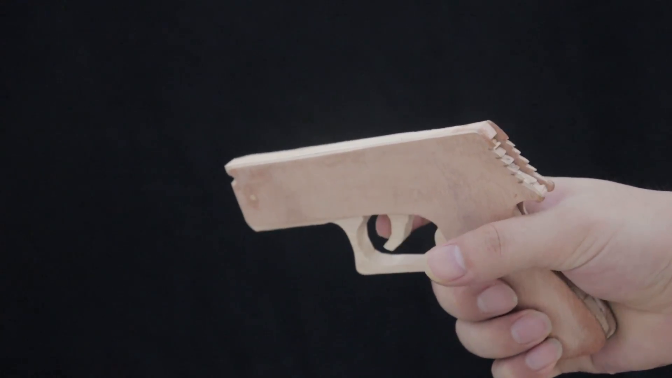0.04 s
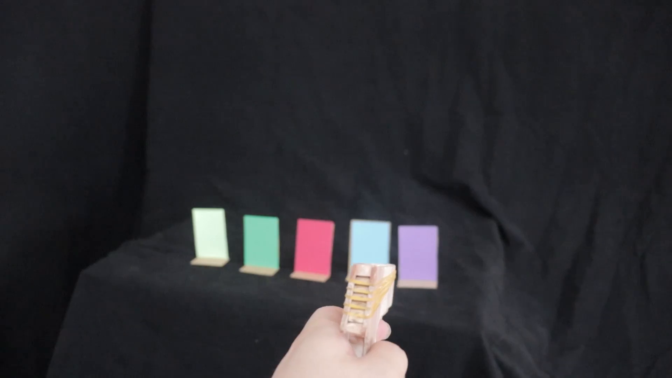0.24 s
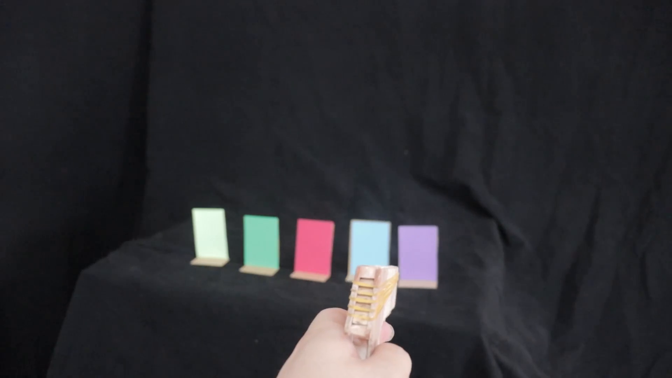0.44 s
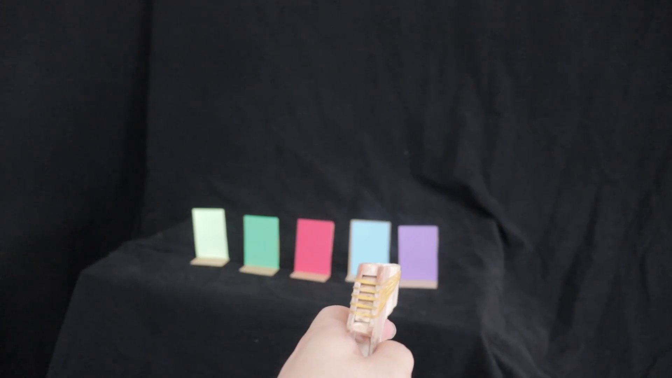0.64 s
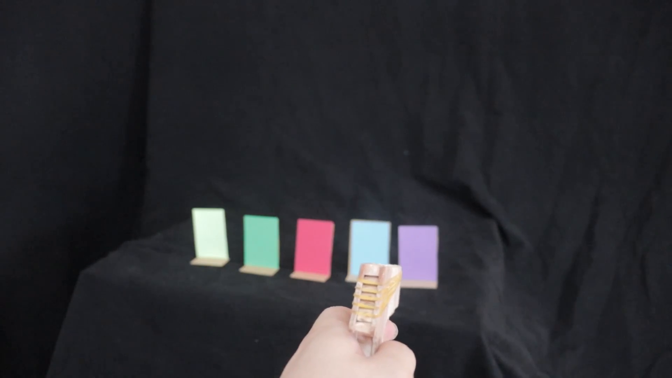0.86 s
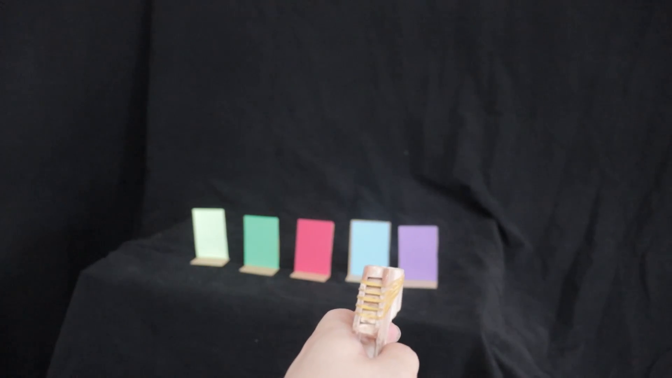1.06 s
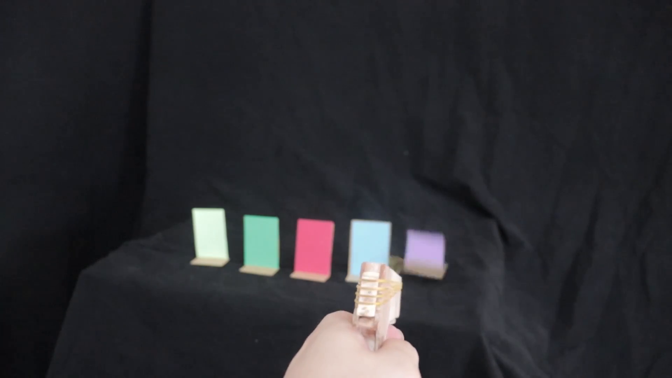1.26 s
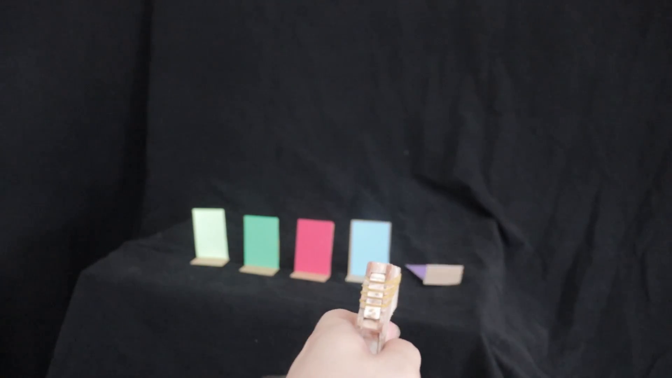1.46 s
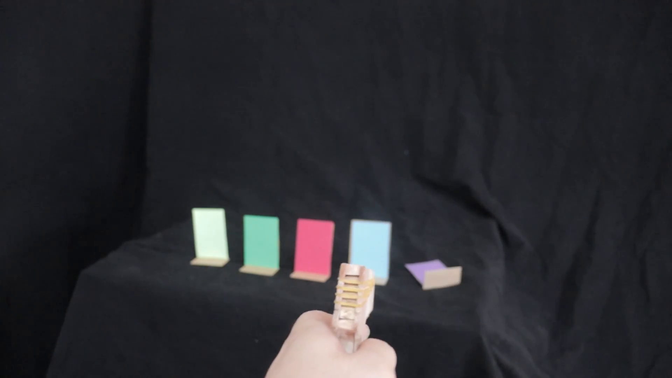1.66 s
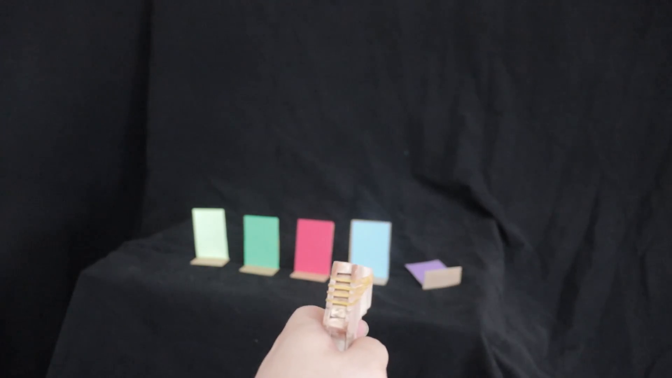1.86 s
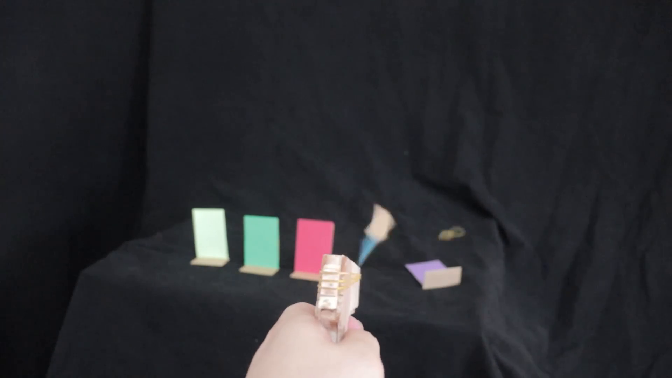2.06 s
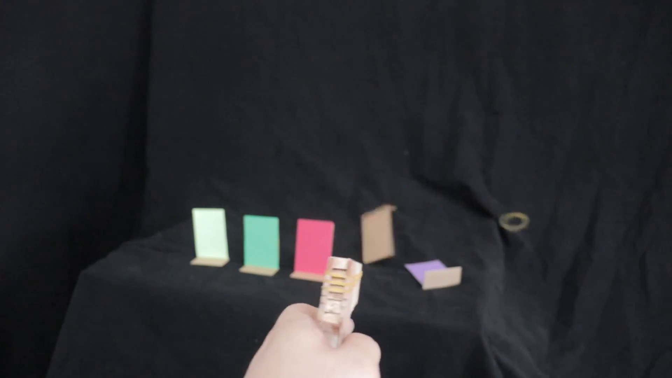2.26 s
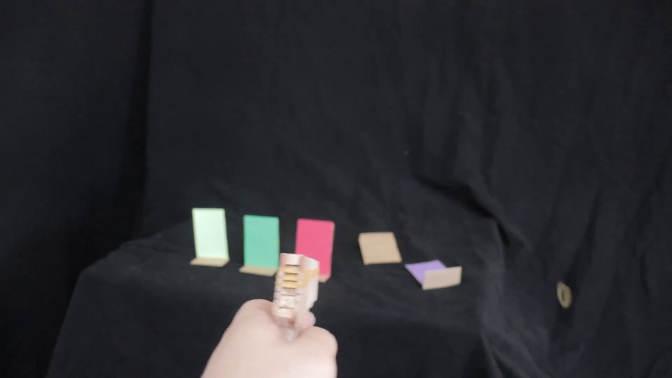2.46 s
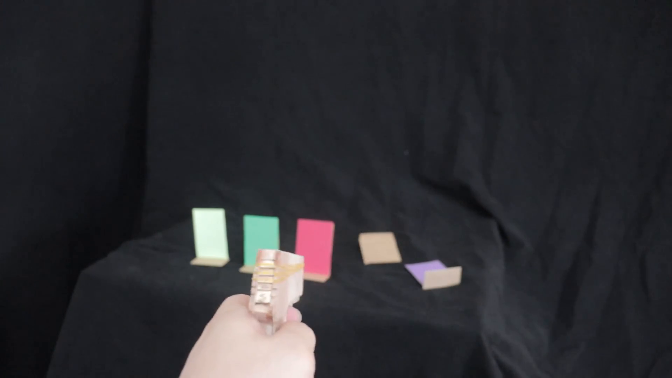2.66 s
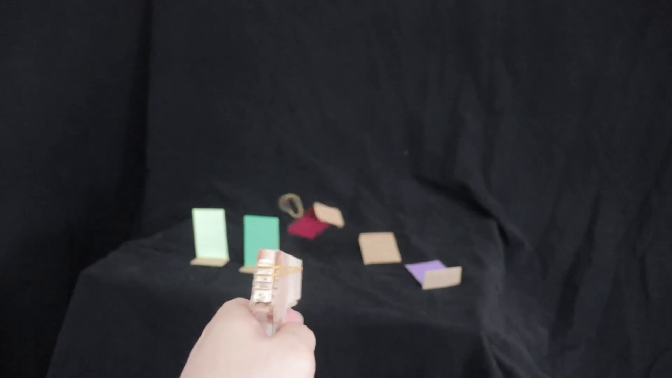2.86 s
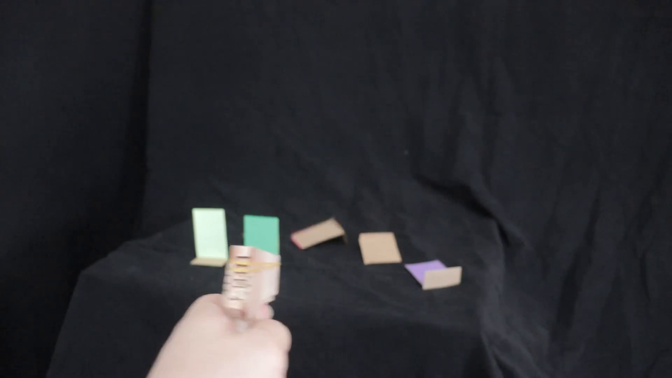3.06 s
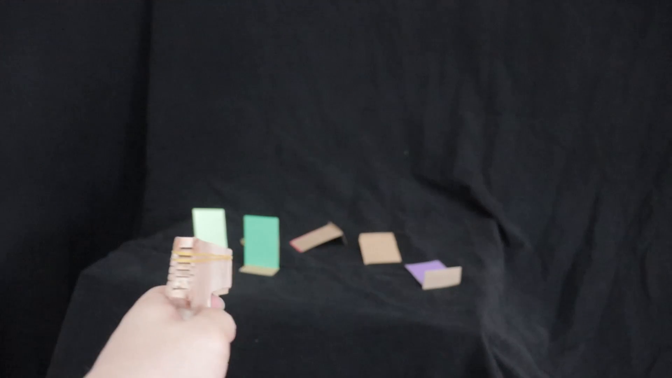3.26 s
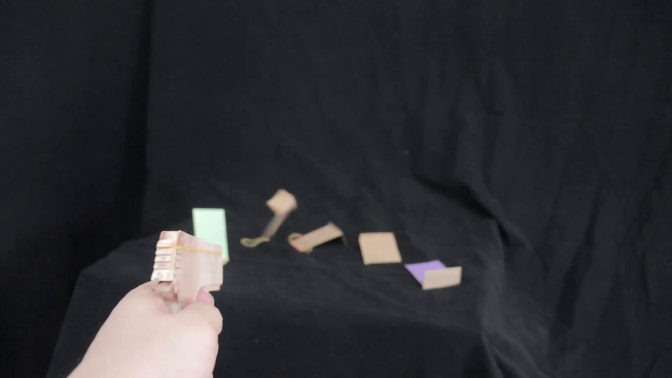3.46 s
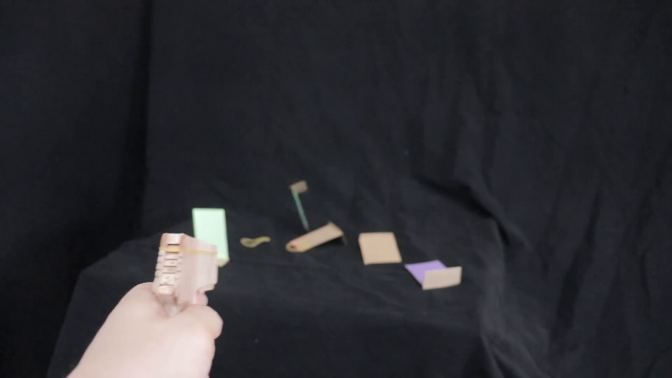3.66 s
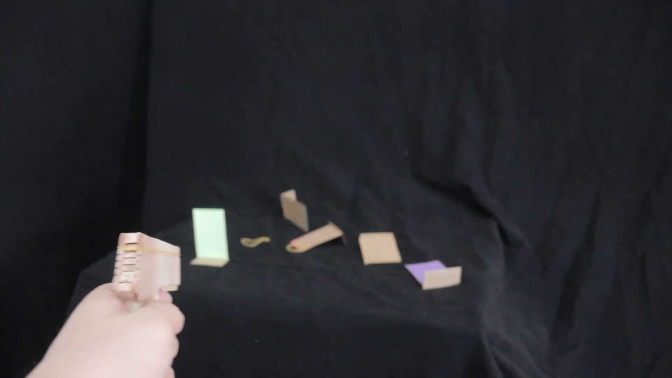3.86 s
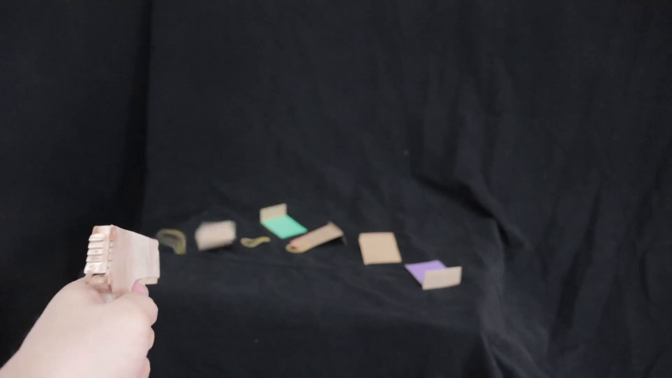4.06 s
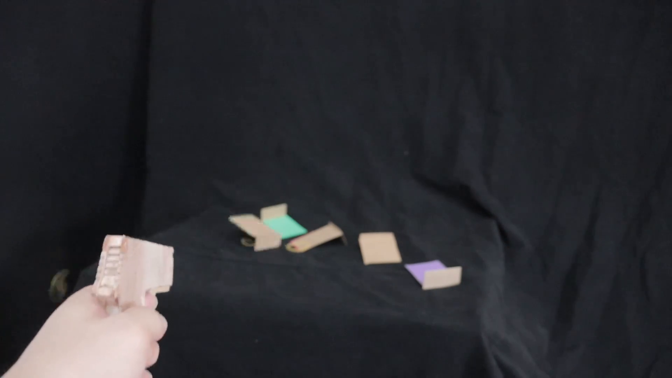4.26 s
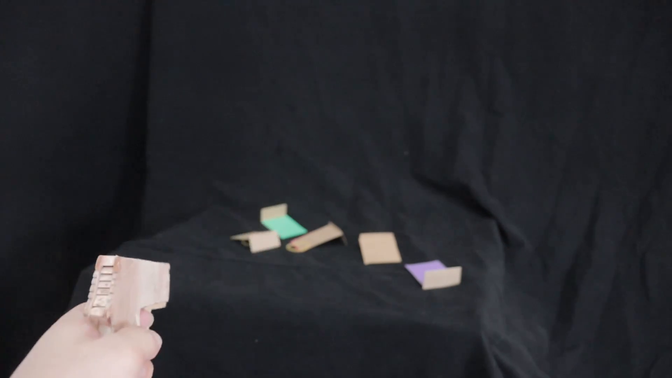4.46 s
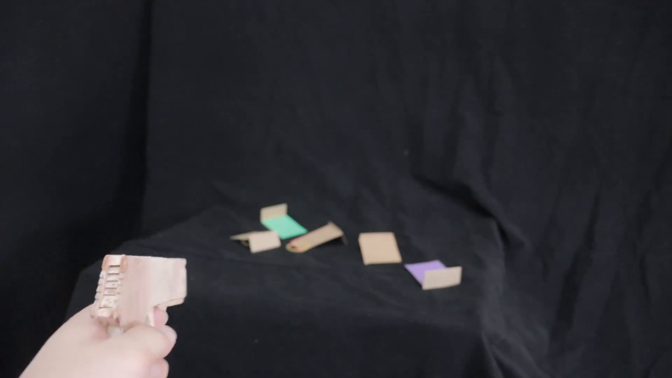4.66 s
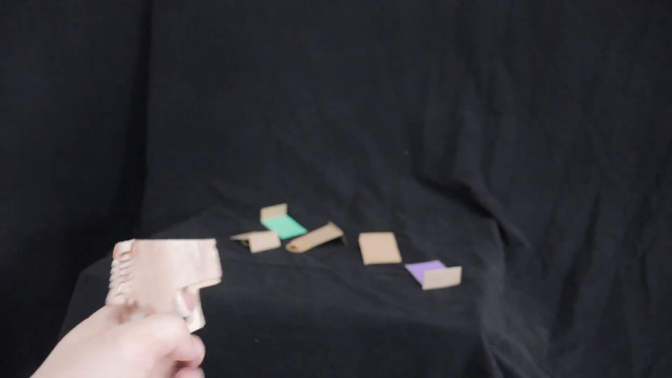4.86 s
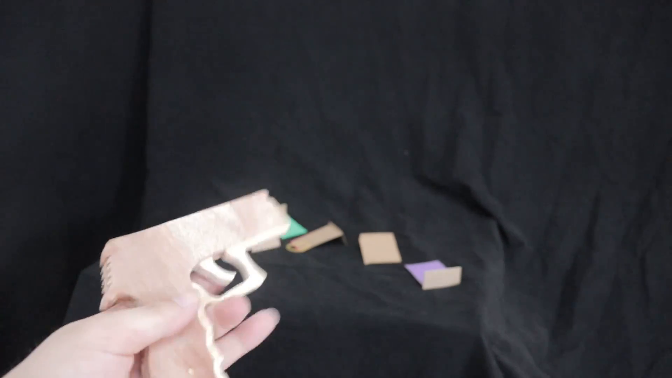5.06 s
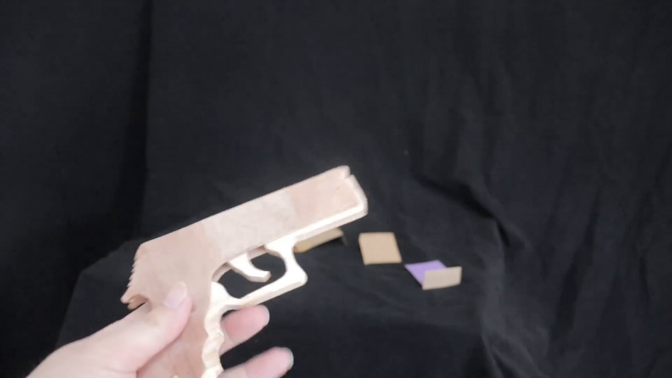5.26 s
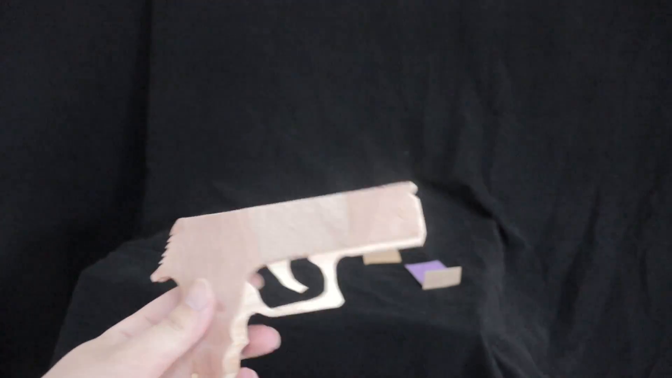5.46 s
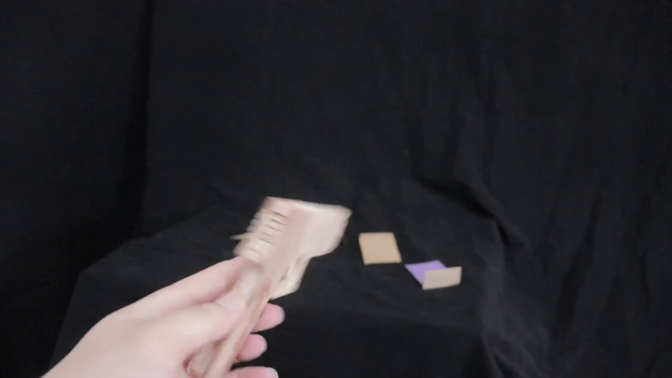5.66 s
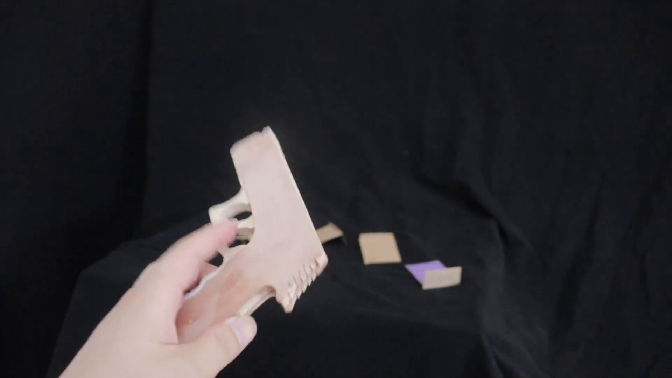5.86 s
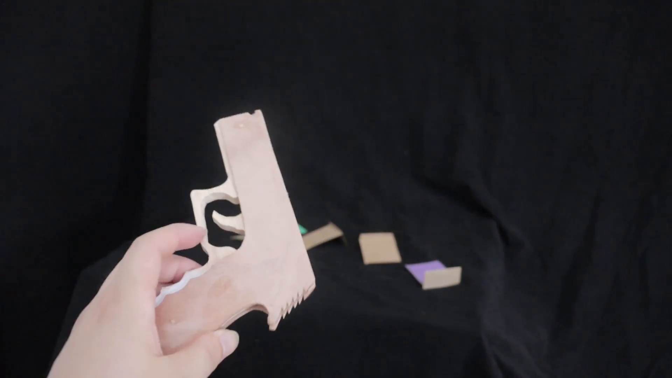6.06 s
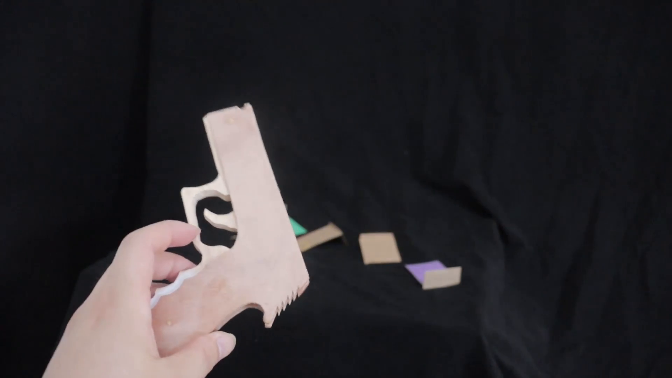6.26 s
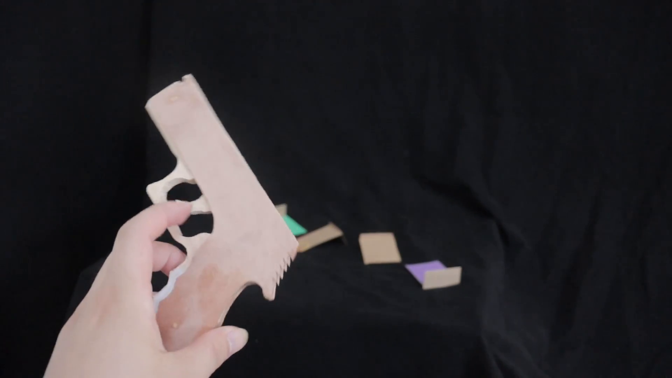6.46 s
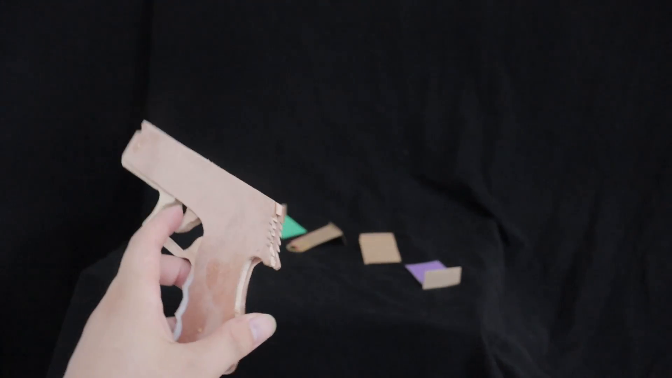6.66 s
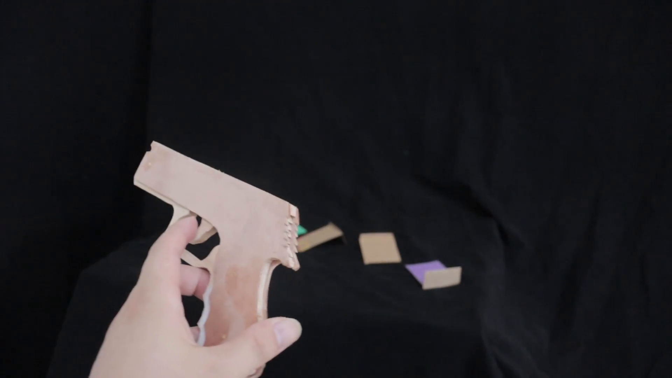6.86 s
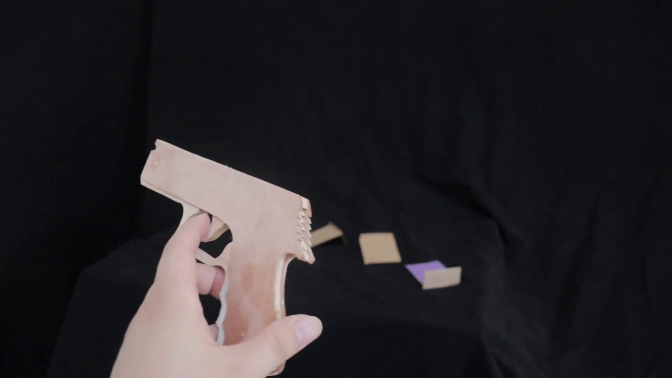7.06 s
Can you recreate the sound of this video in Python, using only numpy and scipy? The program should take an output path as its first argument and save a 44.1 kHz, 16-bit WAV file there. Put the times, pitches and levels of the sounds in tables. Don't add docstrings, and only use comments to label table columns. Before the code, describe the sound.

In a bare, echoing room, the tail of an earlier shot is cut off, leaving faint fan hum. A wooden rubber band gun close to the microphone then fires five times: a creak of rubber, quick ticks, a loud crack, a trigger click. Farther off, light cards skid and knock on a cloth-covered table. Finally hands rub the wood quietly.

```python
import sys
import numpy as np
from scipy import signal
from scipy.fft import rfft, irfft
from scipy.io import wavfile

SR = 44100
rng = np.random.default_rng(int(sys.argv[2]) if len(sys.argv) > 2 else 0)


def rack_gain(trim_db):
    fader = np.asarray(trim_db, float)
    return 10 ** (fader / 20)


def materialize(psi):
    bounded = np.clip(np.atleast_2d(psi).T, -1, 1)
    quanta = np.round(bounded * 32767).astype(np.int16)
    wavfile.write(sys.argv[1], SR, quanta)


N = 313536


def at_hz(points, hz, column=1):
    points = np.array(points)
    return np.interp(np.log(hz), np.log(points[:, 0]), points[:, column])


def rms_one(x):
    return x / np.sqrt(np.mean(x ** 2) + 1e-20)


def drift(rate):
    knots = rng.standard_normal(int(N / SR * 40) + 3)
    return np.interp(np.arange(N) / SR * rate, np.arange(len(knots)), knots)


def bands(spectrum, likeness, size):
    edges = 25 * 2 ** np.arange(0, 9.6, .5)
    white = rng.standard_normal((2, 2, size))
    for k, (low, high) in enumerate(zip(edges, edges[1:])):
        band_pass = signal.butter(2, [low, high], "band", fs=SR, output="sos")
        mid, side = signal.sosfilt(band_pass, white[k % 2])
        hz = min(np.sqrt(low * high), 14000)
        alike = at_hz(likeness, hz)
        pair = np.sqrt(1 + alike) * mid + np.sqrt(1 - alike) * side * [[1], [-1]]
        left, right = rack_gain(at_hz(spectrum, hz)) * pair
        yield hz, np.array([left, np.roll(right, 4)])


def coloured(x, spectrum, modes=()):
    grid_hz = np.maximum(np.arange(1025), 1) * SR / 2048
    power = rack_gain(at_hz(spectrum, grid_hz)) ** 2
    for hz, width, db in modes:
        power = power + rack_gain(db) ** 2 / (1 + (2 * (grid_hz - hz) / width) ** 2) ** 2
    cepstrum = irfft(np.log(power) / 2)
    cepstrum[1:1024] *= 2
    impulse = irfft(np.exp(rfft(cepstrum[:1025], 2048)))
    return signal.fftconvolve(x, [impulse], axes=1)[:, :x.shape[1]]


def body(x, modes):
    out = 0
    for k, (hz, width, db) in enumerate(modes):
        r = np.exp(-np.pi * width / SR)
        poles = [1, -2 * r * np.cos(2 * np.pi * hz / SR), r * r]
        out = out + (-1) ** k * rack_gain(db) * signal.lfilter([1 - r * r, 0, r * r - 1], poles, x)
    return out


def contact(ms, apart=.0):
    pair = []
    for shares in rng.uniform(.15, 1, size=(2, 3)):
        rattle = signal.unit_impulse(SR // 20)
        for lag in np.ceil(shares * ms * 1e-3 * SR).astype(int):
            loop = np.r_[1, np.zeros(lag - 1), -.62]
            rattle = signal.lfilter(loop[::-1], loop, rattle)
        pair.append(rattle)
    side = apart * signal.sosfilt(signal.butter(1, 2500, "high", fs=SR, output="sos"), pair[1])
    return np.array([pair[0] + side, pair[0] - side])


def add(track, s, sound, db, pan_db=0):
    i = round(s * SR)
    piece = sound[:, :track.shape[1] - i] * rack_gain(db) / np.abs(sound.mean(0)).max()
    track[:, i:i + piece.shape[1]] += piece * rack_gain(np.array([[pan_db], [-pan_db]]) / 2)


# [f/Hz, level/dB per Hz]
AIR = [(15, -56), (25, -35), (35, -11), (48, -17.5), (68, 3.5), (87, -11), (154, -7), (410, -11),
       (445, -13.5), (568, -14.5), (1600, -21.5), (2670, -27.5), (2900, -29), (14800, -43), (16500, -57.5)]
# [f/Hz, likeness -1 to 1]
AIR_LIKENESS = [(60, 0.98), (180, 0.97), (550, 0.76), (1650, -0.31), (4970, 0.24), (15000, -0.23)]
# [f/Hz, level/dB rms]
FAN = [(59.2, -56), (166.9, -60.5), (441.4, -60), (500.6, -61.5), (1276, -73.5), (1620, -68.5), (2945, -75)]
# [start t/s, end t/s, start f/Hz, end f/Hz, level/dB]
SQUEALS = [
    (5.697, 5.76, 860, 865, -54.5),
    (5.788, 6.0, 868, 873, -52.5),
    (5.887, 6.02, 1085, 1135, -58),
]


def background():
    air = sum(band * rack_gain(.7 * drift(5)) for hz, band in bands(AIR, AIR_LIKENESS, N))
    air = rms_one(air) * rack_gain(-50)
    t = np.arange(N) / SR
    tones = np.zeros(N)
    for hz, db in FAN:
        level = rack_gain(db + 2.5 + 2.4 * drift(8))
        tones += level * np.sin(2 * np.pi * np.cumsum(hz + 1.5 * drift(9)) / SR)
    for start, end, hz, end_hz, db in SQUEALS:
        swell = np.sin(np.pi * np.clip((t - start) / (end - start), 0, 1))
        glide_hz = np.interp(t, [start, end], [hz, end_hz])
        tones += rack_gain(db - 3.0 + 5.2 * drift(36)) * swell * np.sin(2 * np.pi * np.cumsum(glide_hz) / SR)
    return air + tones


# [f/Hz, time to fall 60 dB t/s, level/dB]
ROOM = [(100, 0.55, 2.5), (220, 1, -10.5), (330, 0.59, 3), (600, 0.58, 1.5), (1500, 0.66, -2.5),
        (4160, 0.66, 0), (9500, 0.48, 0.5), (16000, 0.98, -13.5)]
# [f/Hz, likeness -1 to 1]
ROOM_LIKENESS = [(100, 0.92), (300, 1), (700, 0.48), (1500, .55), (3000, 0.1), (8000, 0.1)]
# [f/Hz, time to fall 60 dB t/s, level/dB]
ROOM_MODES = [(106, 0.96, -3), (167.2, 0.89, -2), (193, 1.1, -1), (224.4, 1.5, -3), (244, 1.2, -0.5),
              (341, 0.55, -10), (412, 0.67, -7.5)]
# [t/ms, level/dB]
ECHOES = [
    (3.6, -12.5),
    (12.5, -11),
    (15.5, -8),
    (18.0, -9),
    (24.5, -16),
    (33.0, -16.5),
]


def room():
    t = np.arange(SR) / SR
    levels = [(hz, db) for hz, t60, db in ROOM]
    diffuse = bands(levels, ROOM_LIKENESS, SR)
    tail = sum(band * rack_gain(-60 * t / at_hz(ROOM, hz)) for hz, band in diffuse)
    for hz, t60, db in ROOM_MODES:
        tail += rack_gain(db - 23 - 60 * t / t60) * np.sin(2 * np.pi * hz * t)
    tail *= 1 - np.exp(-(t / 0.0062) ** 2)
    for ms, db in ECHOES:
        add(tail, ms * 1e-3, contact(ms=0.43, apart=0.98), db + 22.5)
    return tail * rack_gain(-36.5 + np.array([[.7], [-.7]]))


# [f/Hz, level/dB per Hz]
SNAP_CRACK = [(60, -38), (200, -9.5), (600, -15), (1300, -6.5), (3000, -10), (5000, -13.5), (8000, -17.5),
              (12000, -23), (17000, -28.5)]


def snap(modes, ms):
    return coloured(contact(ms, apart=0.9), SNAP_CRACK, modes)


# [t/s, peak level/dB, low, middle and high modes level/dB]
RETURNS = [
    (0.0378, -9, 0.5, -10, -8.5),
    (1.6187, -1, 1, 1.5, 5),
    (2.358, 2, -4, -1.5, 8.5),
    (3.0283, -11, 1.5, -6, -6),
    (3.694, -8, 0, -5, -2.5),
    (4.3225, -13.5, 3, -10, -11.5),
]
# [f/Hz, width f/Hz, level/dB]
TRIGGER_MODES = [(1822, 540, 1), (2200, 110, -0.5), (2800, 590, -0.5), (3144, 120, 4.5), (4740, 460, 1.5),
                 (6354, 200, -9), (7535, 430, -17), (9150, 450, -12), (10770, 810, -19.5),
                 (14900, 1800, -19)]
# [f/Hz, level/dB per Hz]
TRIGGER_CRACK = [(60, -61), (1250, -38.5), (1600, -16), (4000, -9), (9000, -15.5), (17000, -31.5)]


def trigger(rows):
    out = np.zeros((2, N))
    for s, db, low_db, mid_db, high_db in rows:
        crack_db = -1 + 0.22 * high_db
        modes = []
        for hz, width, level in TRIGGER_MODES:
            if hz < 2400:
                tilt_db = low_db
            elif 4000 < hz < 5500:
                tilt_db = mid_db
            else:
                tilt_db = high_db * (5500 < hz < 12000)
            modes.append((hz, width, level - crack_db + tilt_db))
        add(out, s, coloured(contact(ms=.6, apart=0.32), TRIGGER_CRACK, modes), db)
    return out


def earlier_shot(tail):
    lead, cut = round(0.27 * SR), round(.192 * SR)
    near = np.roll(trigger(RETURNS[:1]), lead, axis=1)[:, :lead + cut]
    add(near, 0, snap(SNAP_4, 1.1), 9.5)
    wet = signal.fftconvolve(near.mean(0, keepdims=True), tail, axes=1)[:, :lead + cut]
    return np.pad((near + wet)[:, lead:], ((0, 0), (0, N - cut)))


def ticks(rows):
    out = np.zeros((2, N))
    for s, db, hz, treble_db in rows:
        colour = [(300, -26.0), (1100, -11.5), (2500, -6.0), (6500, -9.0),
                  (9000, treble_db - 8.0), (17000, treble_db - 11.5)]
        add(out, s, coloured(contact(ms=.42, apart=0.73), colour, [(hz, 1100, 0)]), db - .7, 1.5)
    return out


# [t/s, peak level/dB, pitch f/Hz, treble level/dB]
TAPS = [
    (0.3398, -43.5, 2200, 10),
    (1.1874, -35.5, 3210, -14.5),
    (1.213, -35, 1861, -6),
    (1.9444, -39, 3110, -18),
    (5.0874, -32.5, 1498, -0.5),
    (5.1945, -40.5, 1770, 1),
    (5.248, -25.5, 3640, -13),
    (5.9017, -43, 2300, -25),
]


def taps():
    return ticks(TAPS)


def stroke(s, db, length, rise, sag_db_per_s, treble_db=0, release=.035):
    end_s, end_db = s + length, db - sag_db_per_s * length
    return [(s - rise, db - 20, treble_db), (s, db, treble_db),
            (end_s, end_db, treble_db), (end_s + release, end_db - 20, treble_db)]


def friction(strokes, colour, per_s, alike):
    strength = rack_gain(2.2 * rng.exponential(1, (2, N))) * rng.choice([-1, 1], (2, N))
    slips = (rng.random((2, N)) < per_s / SR) * strength
    grit = rms_one(coloured(slips + alike * slips[::-1], colour))
    dull = signal.sosfilt(signal.butter(2, 5500, fs=SR, output="sos"), grit)
    out = np.zeros((2, N))
    for rows in strokes:
        s, db, treble_db = np.transpose(rows)
        span = np.arange(round(s[0] * SR), round(s[-1] * SR))
        treble = (grit - dull)[:, span] * rack_gain(np.interp(span / SR, s, treble_db))
        out[:, span] += rack_gain(np.interp(span / SR, s, db)) * (dull[:, span] + treble)
    return out


# [f/Hz, level/dB per Hz]
RUB_COLOUR = [(300, -31.5), (1400, -12.5), (2200, 0.5), (3600, -5), (5000, -10.5), (8000, -12.5),
              (15000, -17)]
# [hold t/s, level/dB, slip t/s, level/dB]
PULLS = [
    (1.212, -51.5, 1.295, -47),
    (2.022, -48, 2.17, -46.5),
    (2.755, -51.5, 2.905, -39),
    (3.41, -50, 3.458, -42.5),
    (4.058, -50.5, 4.108, -40),
]
# [t/s, level/dB, length t/s, treble level/dB]
RUBS = [
    (4.976, -63.5, 0.033, 4),
    (5.042, -58.5, 0.08, 0.5),
    (5.2, -64.5, 0.021, 6),
    (5.27, -60, .15, 2),
    (5.605, -59, 0.1, -1),
    (5.716, -47.5, .015, -3.5),
]


def hands():
    strokes = []
    for s, db, length, treble_db in RUBS:
        strokes.append(stroke(s, db, length, .035, 40, treble_db))
    for (hold_s, hold_db, slip_s, slip_db), (snap_s, *_) in zip(PULLS, SHOTS):
        strokes.append(stroke(hold_s, hold_db, slip_s - hold_s, .022, 149.5, treble_db=3))
        strokes.append(stroke(slip_s, slip_db, snap_s - slip_s, .004, 0, treble_db=-3, release=.002))
    return friction(strokes, RUB_COLOUR, per_s=6300, alike=0.25)


# [t/s, peak level/dB, pitch f/Hz, treble level/dB]
SLIPS = [(1.2602, -24.5, 2630, -2), (1.2779, -27, 2800, -13.5), (1.291, -20.5, 3200, -5),
         (1.3056, -10.5, 4000, 1.5), (1.3162, -18.5, 6590, -15.5), (2.0573, -17, 4500, -5.5),
         (2.0708, -22.5, 3128, -6), (2.0764, -9.5, 6000, 5), (2.787, -30, 3200, -15),
         (2.8047, -15, 2900, -2), (2.8112, -15.5, 3300, 1.5), (3.4481, -17.5, 3500, 4),
         (3.4554, -14.5, 2200, 6.5), (3.466, -26, 2410, -5), (4.1021, -16.5, 2400, 10),
         (4.1064, -9.5, 2330, 8.5), (4.1162, -19, 3038, -16), (4.1234, -6.5, 2668, -15)]


def band_slips():
    slaps = []
    for s, db, hz, treble_db in SLIPS:
        delay_ms = 2.2 - .125 * db
        slaps.append((s + delay_ms * 1e-3, db - 0.8, hz * .75, treble_db - 6.5))
    return ticks(SLIPS) + ticks(slaps)


# [t/s, peak level/dB, rattle t/ms]
SHOTS = [
    (1.3268, 3.5, .55),
    (2.096, 1, 1.17),
    (2.827, 1.5, 1.1),
    (3.4785, 0.5, .55),
    (4.1263, -0.5, 0.88),
]
# [f/Hz, width f/Hz, level/dB]
SNAP_1 = [(1260, 130, -1), (1890, 380, -4), (2400, 120, -7.5), (3986, 500, -1.5), (5500, 600, -8.5),
          (6800, 710, -8), (14000, 3500, -18)]
SNAP_2 = [(1400, 850, -2), (2370, 160, -1), (3160, 590, -3), (5470, 360, -14), (6050, 200, -15),
          (7540, 260, -17)]
SNAP_3 = [(800, 170, -8), (1300, 170, -4.5), (1930, 300, -1), (2857, 690, -0.5), (3473, 360, -4),
          (5330, 300, -11.5), (6430, 580, -9.5), (14000, 3000, -24)]
SNAP_4 = [(1753, 260, -1.5), (2620, 500, -4), (3515, 540, -4.5), (4500, 280, -7), (5400, 330, -8),
          (6370, 300, -8.5), (8410, 460, -14.5)]
SNAP_5 = [(1620, 270, -5), (2630, 650, 1.5), (3370, 170, 2), (3960, 330, -3.5), (12200, 700, -20),
          (15000, 1200, -22)]


def shots():
    out = np.zeros((2, N))
    for (s, db, ms), modes in zip(SHOTS, [SNAP_1, SNAP_2, SNAP_3, SNAP_4, SNAP_5]):
        add(out, s, snap(modes, ms), db + 3.0)
    return out


# [f/Hz, level/dB per Hz]
CLOTH = [(150, -12), (400, -6.5), (1200, 3.5), (2600, -1), (5000, -3), (9000, -17), (15000, -23.5)]
# [t/s, level/dB, length t/s]
SKIDS = [
    (1.39, -35, 0.31),
    (2.177, -41.5, 0.13),
    (2.894, -34.5, 0.16),
    (3.091, -46, 0.046),
    (3.537, -36.5, 0.11),
    (4.217, -30, 0.38),
]


def skids():
    strokes = [stroke(s, db, length, 0.089, 100) for s, db, length in SKIDS]
    return friction(strokes, CLOTH, per_s=3300, alike=.6)


# [t/s, peak level/dB, brightness f/Hz, bounce t/ms]
LANDINGS = [(1.398, -24, 713, 85), (2.12, -25, 563.4, 54.4), (2.4678, -20, 1710, 25.8),
            (2.86, -23.5, 701, 46), (3.03, -27, 404.6, 53), (3.064, -18.5, 1500, 32),
            (3.51, -22.5, 555, 35), (3.64, -21, 600, 16), (3.73, -26.5, 444, 36.5), (3.884, -22.5, 800, 26),
            (4.293, -23.5, 680, 16.7), (4.358, -31, 600, 45), (4.458, -33, 695, 45),
            (5.2454, -34, 1700, 4.03)]
# [f/Hz, width f/Hz, level/dB]
TABLE_TOP = [(188.4, 50, 1.5), (249.4, 46, 6), (329.4, 34, -3.5), (416, 80, 2.5), (540, 310, -1.5),
             (1242, 1700, 0)]


def knocks():
    out = np.zeros((2, N))
    for s, db, hz, bounce_ms in LANDINGS:
        for k in range(3):
            cut_hz = hz * .8 ** k
            band_pass = signal.butter(3, [90, cut_hz], "band", fs=SR, output="sos")
            push = signal.sosfilt(band_pass, contact(ms=0.24))
            boom_db = 4 + 2 * np.log2(cut_hz / 900)
            spot = [(f, width, level + rng.normal(0, 4)) for f, width, level in TABLE_TOP]
            knock = push + rack_gain(boom_db) * body(push, spot)
            add(out, s + k * bounce_ms * 1e-3, knock, db - k * 5.5, .7)
    return out


def scene():
    tail = room()
    gun = taps() + hands() + band_slips() + shots() + trigger(RETURNS[1:])
    cards = skids() + knocks()
    send = (gun + rack_gain(3.5) * cards).mean(0, keepdims=True)
    wet = signal.fftconvolve(send, tail, axes=1)[:, :N]
    hum = background() * rack_gain(np.array([[.4], [-.4]]))
    return gun + rack_gain(-0.3) * cards + wet + earlier_shot(tail) + hum


def low_pass(x):
    return signal.sosfilt(signal.butter(12, 16050, fs=SR, output="sos"), x)


def record(dry):
    over_db = np.maximum(20 * np.log10(np.abs(dry).max(0) + 1e-9) + 8, 0)
    fall = 60.0 * np.arange(N) / SR
    held = np.maximum.accumulate(0.29 * over_db + fall) - fall
    r = np.exp(-1 / (0.0082 * SR))
    ducked = dry * rack_gain(-signal.lfilter([1 - r], [1, -r], held))
    return low_pass(np.clip(ducked, -1, 1))


dry = scene()
out = record(dry)
materialize(out)
```